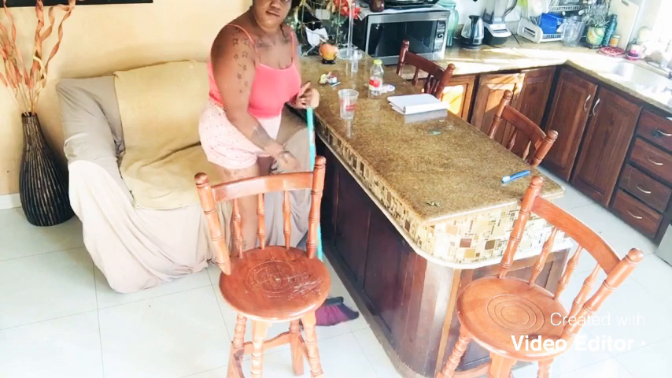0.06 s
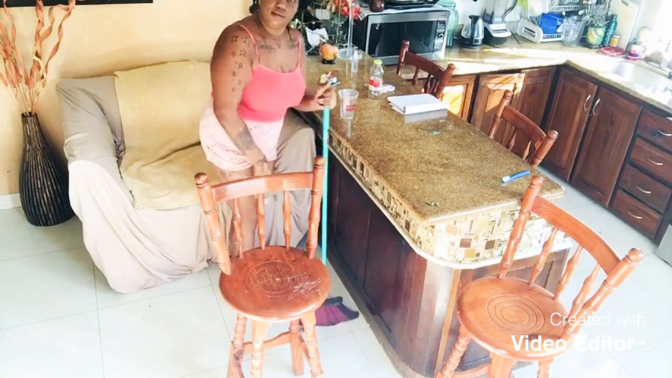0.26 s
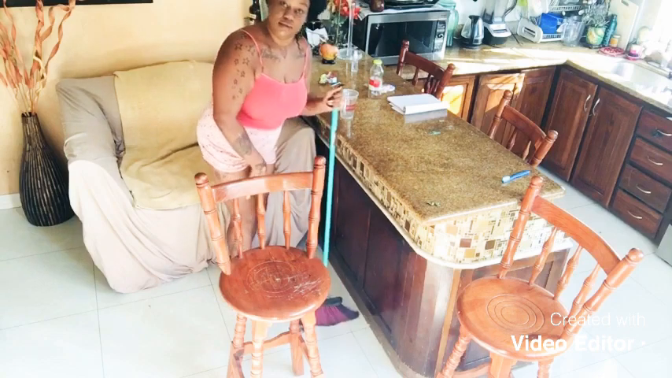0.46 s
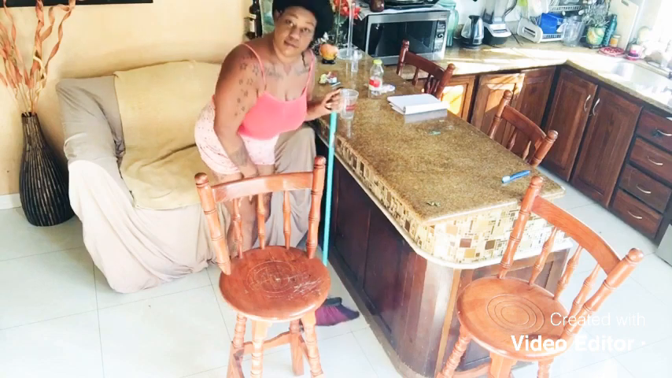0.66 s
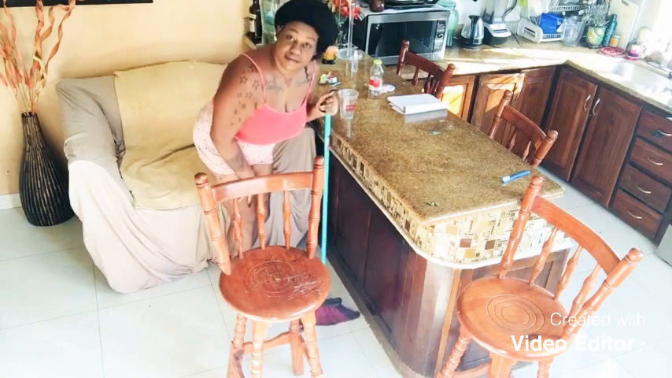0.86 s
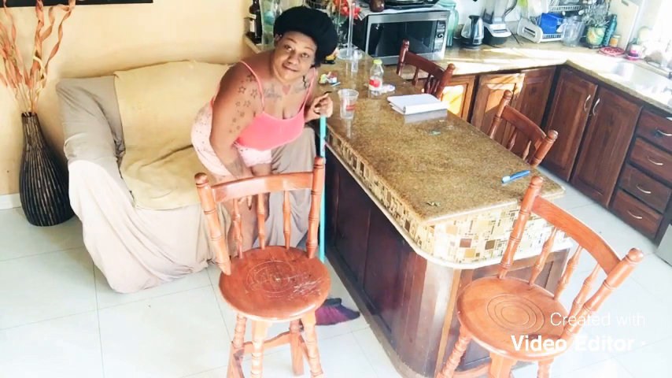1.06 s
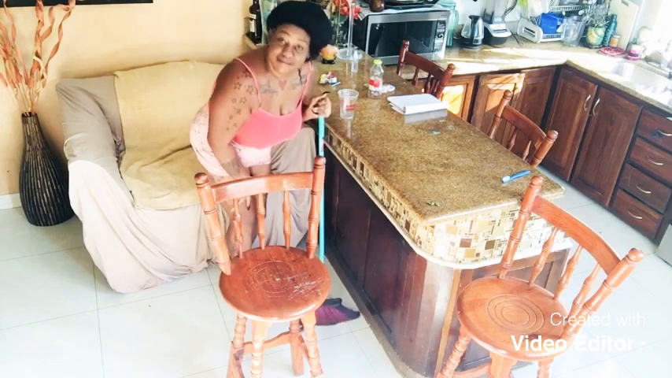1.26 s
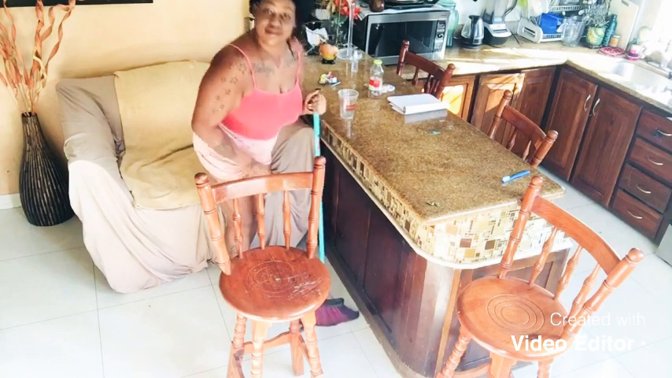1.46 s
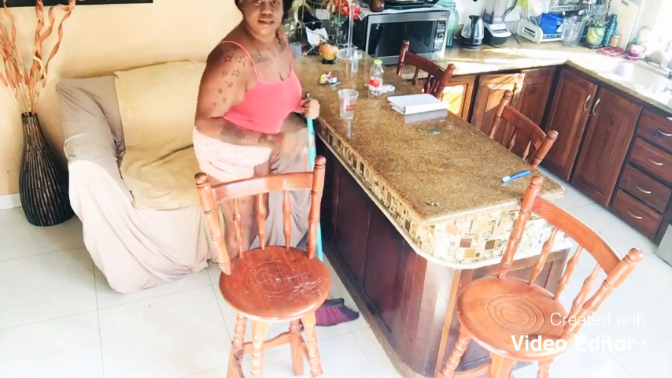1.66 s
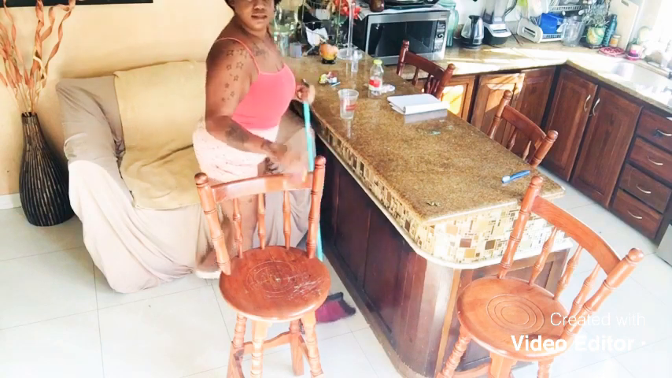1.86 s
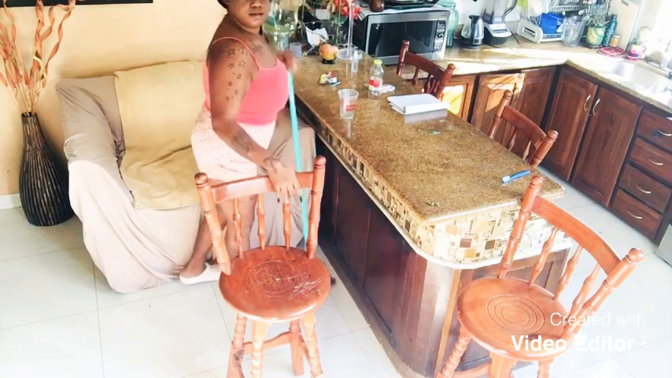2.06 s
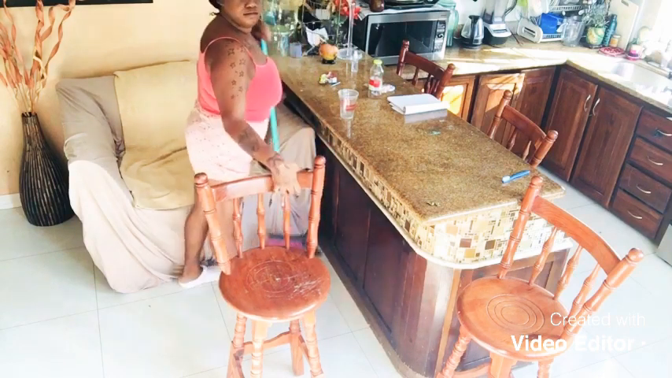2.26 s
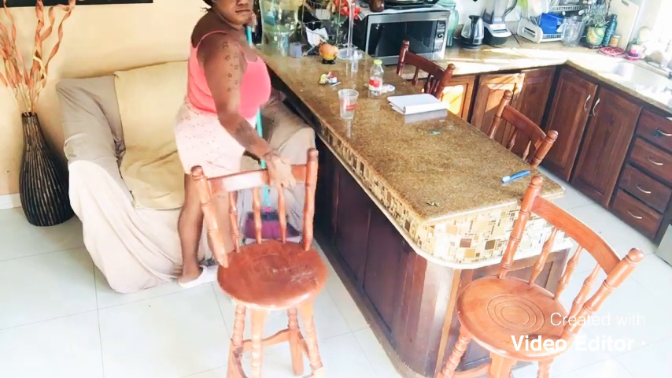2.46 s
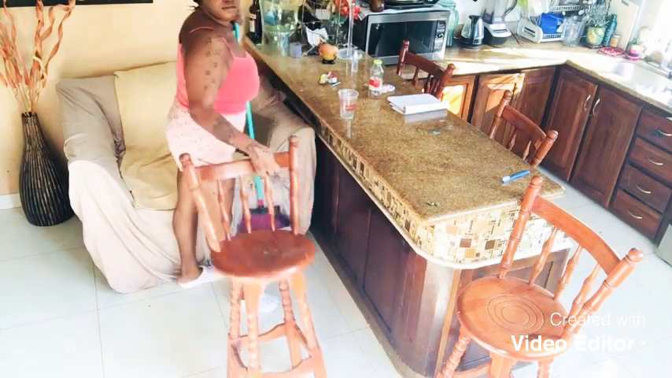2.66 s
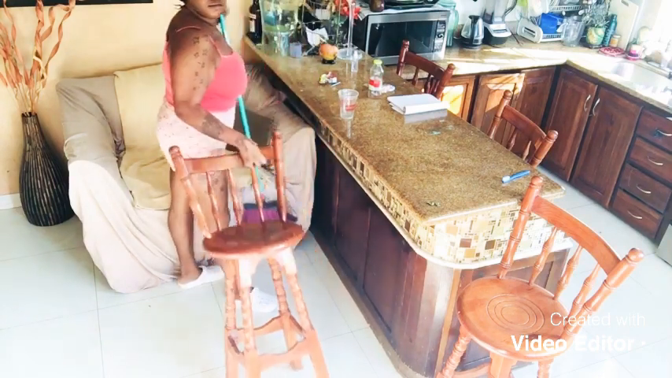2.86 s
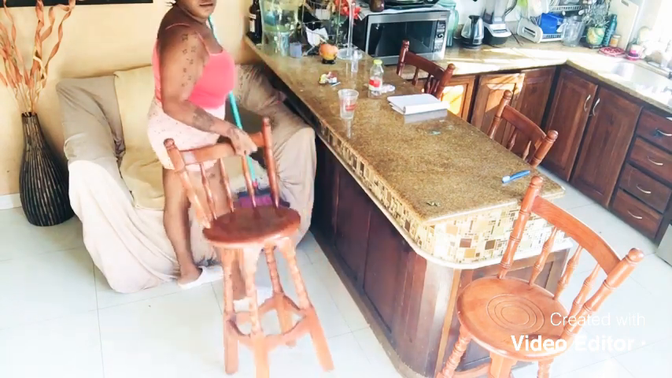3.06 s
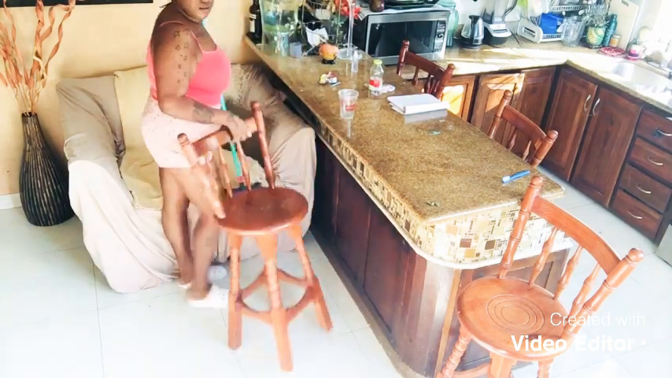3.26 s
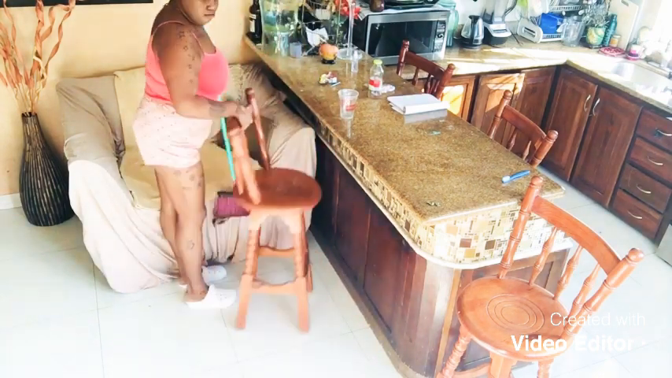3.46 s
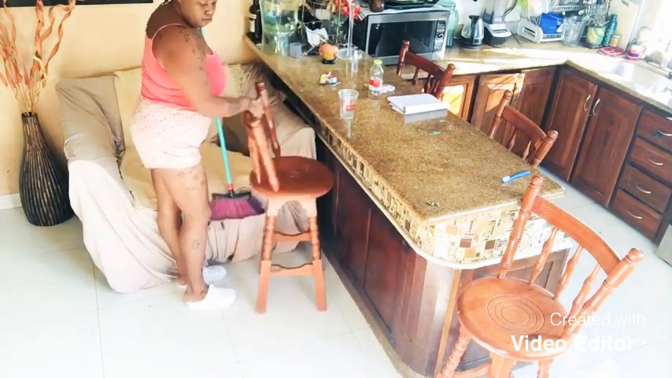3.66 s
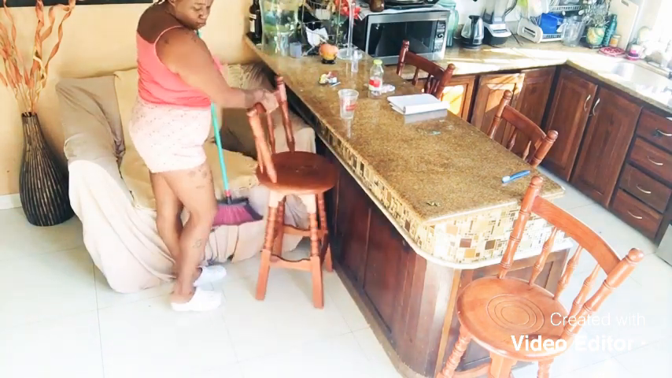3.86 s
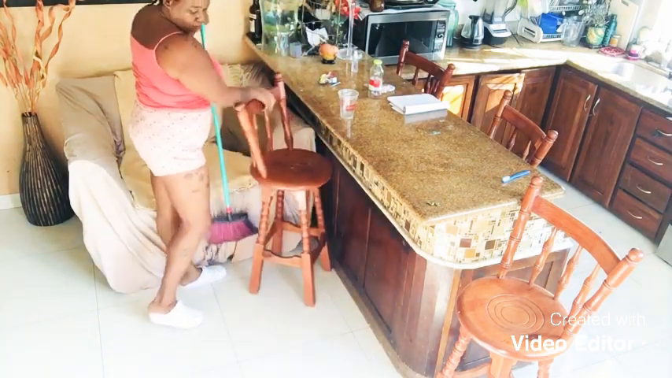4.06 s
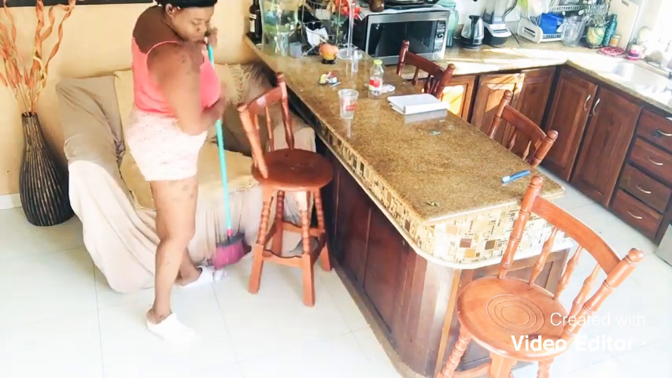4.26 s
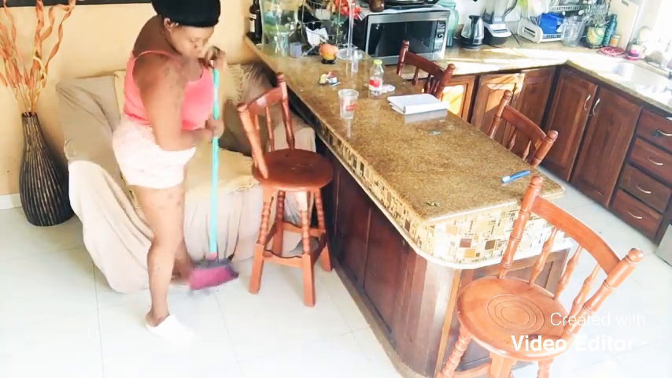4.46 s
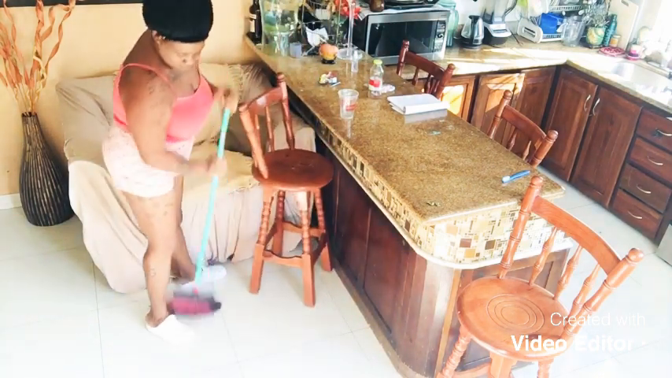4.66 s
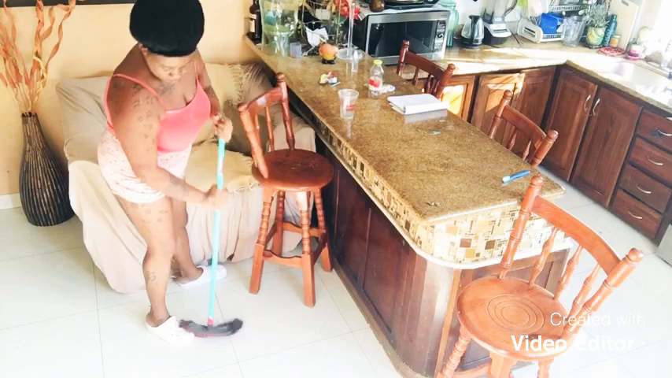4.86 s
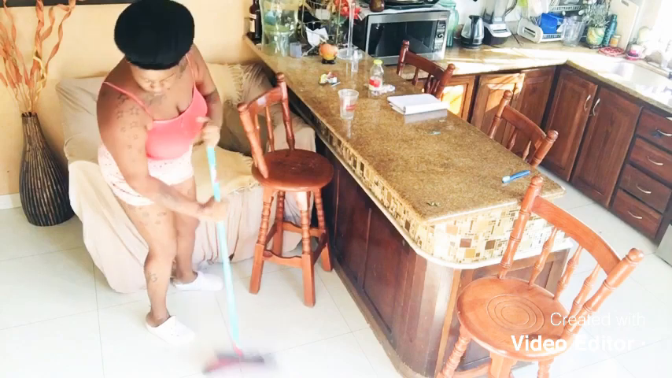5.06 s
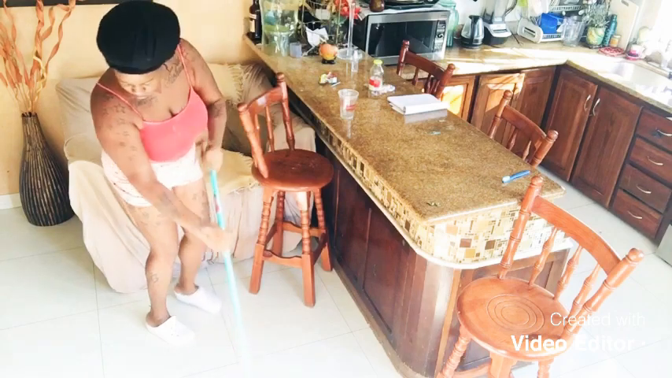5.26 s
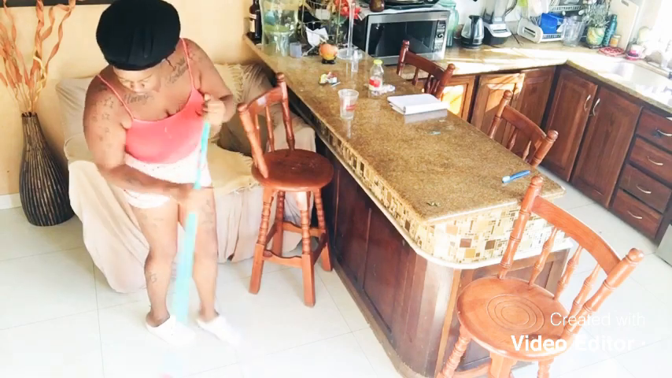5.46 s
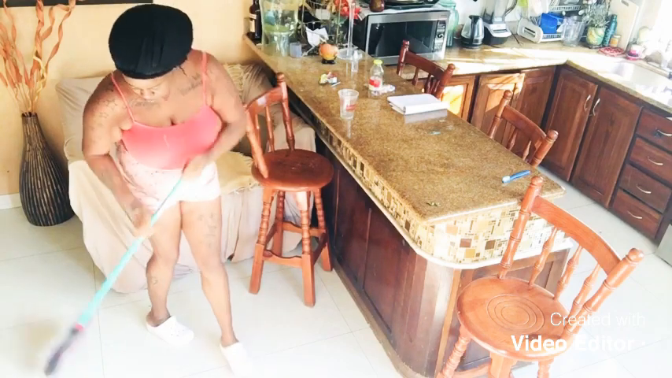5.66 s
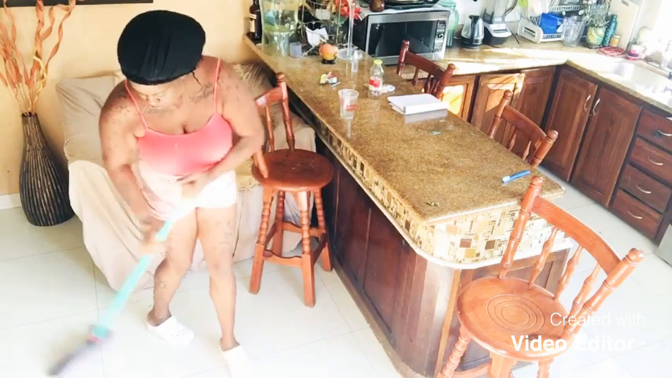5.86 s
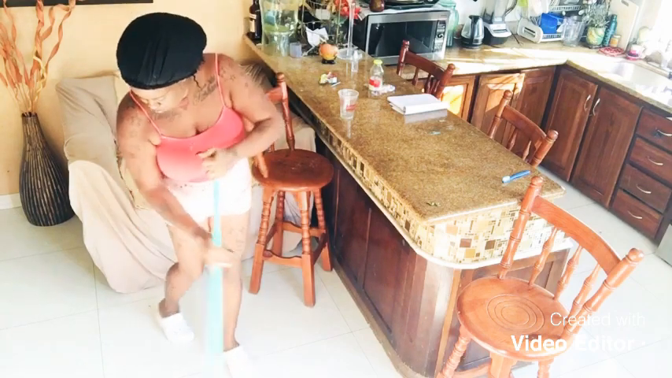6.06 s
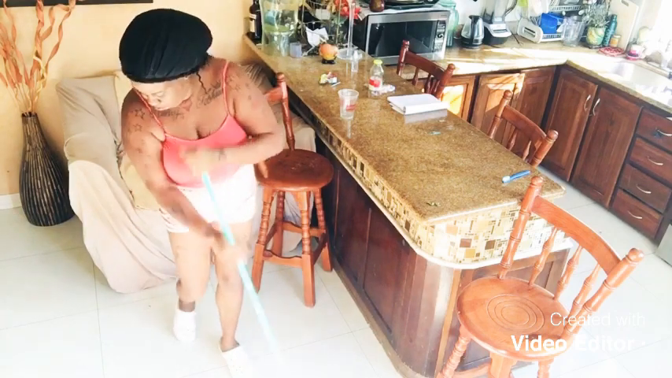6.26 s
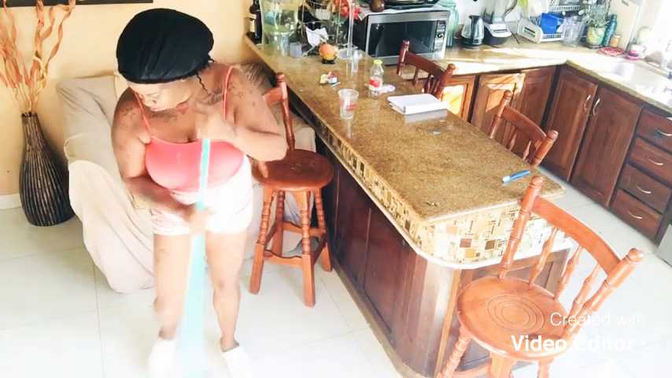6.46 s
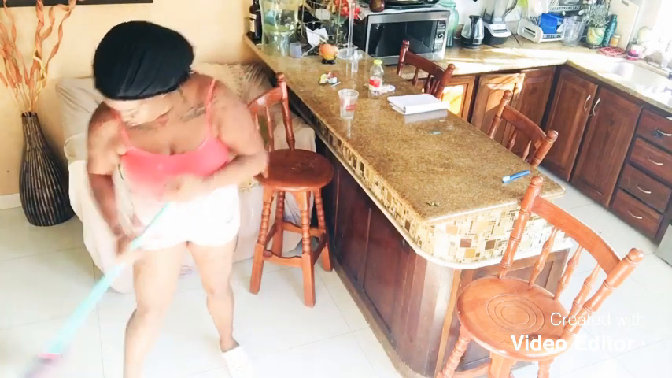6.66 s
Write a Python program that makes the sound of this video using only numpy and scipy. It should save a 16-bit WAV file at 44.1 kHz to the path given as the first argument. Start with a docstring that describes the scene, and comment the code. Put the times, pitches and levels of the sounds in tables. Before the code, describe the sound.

A wooden stool clatters onto kitchen tiles and scrapes along in several rough shoves, lasting about a second and a half near the middle. Before and after it come much quieter broom swishes and small clacks of the hollow handle, with one faint shoe squeak shortly before the stool moves. A refrigerator hums underneath, and the room rings briefly after each knock, all heard in mono through a phone microphone.

```python
"""A wooden bar stool is tipped, set down hard and dragged over kitchen tiles: its feet stick and slip,
ringing the wood and shaking the frame. Around it a broom's bristles sweep the floor, its hollow handle
clacks, and a rubber sole squeaks once. One phone microphone takes it all in mono, with the hard room
ringing after each knock and scrape and a refrigerator humming in the background."""
import sys
import numpy as np
from scipy import signal
from scipy.fft import rfft, irfft, next_fast_len
from scipy.io import wavfile
from scipy.ndimage import uniform_filter1d, map_coordinates

SR = 44100
rng = np.random.default_rng(int(sys.argv[2]) if len(sys.argv) > 2 else 0)


def to_wav(s):
    """Save 16-bit WAV."""
    ch = np.atleast_2d(s).T  # columns
    pcm = np.round(np.clip(ch, -1, 1) * 32767)  # PCM
    wavfile.write(sys.argv[1], SR, pcm.astype(np.int16))


N = 295911
T = np.arange(N) / SR
GRIP_S = 0.02  # time for a shove to take hold

# broad colour of the stool's wood: frequency_hz, relative_db
WOOD_COLOUR = [(40, -31.5), (75, -12), (150, -15), (300, -4.5), (600, -5.5), (1100, -2.5), (1800, -2),
               (2600, -6), (3500, -7.5), (4200, -14), (4900, -25.5), (6800, -28.5), (10000, -37),
               (15500, -50.5)]
# ringing of the seat and legs: pitch_hz, width_hz, boost_db
STOOL_MODES = [(477.3, 26, 4), (570, 20, 3.5), (649, 30, 5.5), (858.4, 23, 1.5), (967, 29, 5),
               (1112, 30, 7.5), (1180, 22, 1.5), (1300, 8.3, 0), (1510, 29, 1.5), (1624, 20, 7.5),
               (1735, 23, 4.5), (2027, 50, 4), (2166, 25, 4.5), (2307, 30, 1), (2586, 35, 1.5),
               (2860, 28, 0)]
# short slides of the stool, levels relative: start_s, length_s, scrape_db, grit_db, sway_db, judder_db
SHOVES = [(2.99, .11, -50.5, -70, -38.5, -49.5), (3.227, 0.057, -52.5, -58.5, -39, -51.5),
          (3.37, 0.031, -18, -49, -31, -29.5), (3.461, 0.249, -27, -52, -38, -29),
          (3.702, .125, -28, -49, -32, -30), (3.959, 0.09, -39, -57, -31.5, -35),
          (4.138, 0.046, -50, -56, -43, -41.5), (4.224, 0.059, -32, -53.5, -41, -29.5),
          (4.32, .05, -54, -59.5, -52, -45)]


def stool_blows(gain_db=16):
    """A leg strikes the tiles and rings the wood; the foot's rattle and near walls smear it to a clatter."""
    # leg strikes: start_s, relative_db, hardness_db, treble_db, thump_db, rattle_t60_s
    blows = [(2.978, -12.5, -4, 11, 3, 0.26), (3.235, -32, -7.5, 2.5, 1, 0.11),
             (3.368, 1.5, -6.5, 2, -12, 0.05), (3.378, -1, -2, 3, -8.5, 0.052),
             (3.961, -12, -5.5, 1, 3, 0.11), (3.975, -10, -26, -7, 0.5, 0.079),
             (4.207, -20.5, -3.5, 11, 6, 0.11), (4.228, -27, -15, 6, -2, 0.062)]
    out = np.zeros(N)
    for start, db, hard_db, treble_db, thump_db, rattle_t60 in blows:
        wood = body(WOOD_COLOUR, STOOL_MODES, hard_db, treble_db, thump_db)
        clatter = through(wood, room(wet_db=12.5, early_db=12.5, early_t60=rattle_t60))
        add(out, start, amp(db + gain_db) * unit_energy(clatter))
    return out


def stool_bites(gain_db=1):
    """Where a foot grips harder, its slips swell into a short, harsh rasp."""
    # a sliding foot bites into the tile: centre_s, relative_db, half_length_s, hardness_db
    bites = [(3.428, -25, 0.0027, 3), (3.521, -27.5, 0.008, -2), (3.549, -14.5, 0.0042, 1.5),
             (3.562, -16, 0.0028, -10), (3.579, -24, 0.0035, 4.5), (3.636, -26.5, 0.0093, -6.5),
             (3.692, -23.5, 0.0082, -3.5), (3.714, -17.5, 0.0054, 1), (3.734, -18.5, 0.008, 0.5),
             (3.766, -27.5, 0.0052, -1), (3.793, -19.5, 0.01, 6), (4.025, -37, 0.019, -4),
             (4.269, -25.5, 0.0047, -2.5)]
    out = np.zeros(N)
    t = T[:SR // 10] - .05  # seconds from the centre of a bite
    for centre, db, half_length, hard_db in bites:
        force = slips(rate_hz=900, scatter=.6, spread_db=3)[:len(t)] * np.exp(-(t / half_length) ** 2)
        wood = body(WOOD_COLOUR, STOOL_MODES, hard_db, bass_db=-7)
        rasp = through(force, wood, room(wet_db=-1, early_db=1.5))
        add(out, centre + t[0], amp(db + gain_db) * np.sqrt(2 * half_length * SR) * unit_energy(rasp))
    return out


def stool_drag(grit_gain_db=-.5):
    """The feet stick and slip on the tiles; fine grit hisses under them and rolls on after each shove."""
    starts, lengths, scrape_db, grit_db, _, _ = np.transpose(SHOVES)
    force = slips(rate_hz=300, scatter=.5, spread_db=4.5)
    wood = body(WOOD_COLOUR, STOOL_MODES, hard_db=-3, treble_db=-5.5, bass_db=-.5)
    scrape = unit_rms(through(force, wood)) * movements(starts, lengths, scrape_db, GRIP_S, t60=.2)
    # hiss of loose grit: frequency_hz, relative_db
    grit_colour = [(2500, -29.5), (4500, 0.5), (6800, -1.5), (8000, -12), (10000, -9.5), (12500, -16.5),
                   (15500, -23)]
    grit = coloured(rng.standard_normal(N) * amp(3.8 * wobble(470)), grit_colour)
    grit *= movements(starts, lengths, grit_db + grit_gain_db, GRIP_S, t60=.3)
    return through(scrape + grit, room(wet_db=-2.5, early_db=0))


def stool_frame(sway_gain_db=-3, judder_gain_db=-2):
    """The whole frame sways and judders with every shove, then settles."""
    # the frame's lowest bending mode: pitch_hz, width_hz, relative_db
    sway_modes = [(73.3, 22, -0.5)]
    # its higher bending modes: pitch_hz, width_hz, relative_db
    judder_modes = [(132, 24, -10), (173.9, 18, 0.5), (192.3, 18, -6), (237.4, 17, -6.5), (254, 15, -10),
                    (334.7, 24, -10), (357.4, 23, -3)]
    starts, lengths, _, _, sway_db, judder_db = np.transpose(SHOVES)
    sway = bending(sway_modes) * movements(starts, lengths, sway_db + sway_gain_db, GRIP_S, t60=.35)
    judder = bending(judder_modes) * movements(starts, lengths, judder_db + judder_gain_db, GRIP_S, t60=.46)
    return sway + judder


def bending(modes):
    """Slips shake low modes that pass no treble; friction holds the swing near rms 1."""
    def response(hz):
        return sum(amp(db) * (1j * hz * width / (pitch ** 2 - hz ** 2 + 1j * hz * width)) ** 2
                   for pitch, width, db in modes)
    ring = filtered(slips(rate_hz=90, scatter=.6, spread_db=2.5), response)
    power = np.abs(uniform_filter1d(ring ** 2, size=3000))
    return ring / np.sqrt(power + 1e-12)


def broom_sweeps(bristle_gain_db=-1, rub_gain_db=-6, lift_t60=.35):
    """Countless bristles flick over the tiles while the head rubs more darkly."""
    # broom strokes, levels relative: start_s, length_s, bristle_db, rub_db
    strokes = [(1.26, 0.28, -74.5, -69), (1.468, 0.13, -67, -69.5), (2.18, 0.053, -61, -55),
               (2.27, 0.22, -72, -59), (2.704, 0.15, -70, -62), (2.819, 0.26, -63.5, -55),
               (3.17, .16, -56, -50.5), (4.601, 0.052, -56, -60.5), (4.66, 0.086, -56.5, -54),
               (4.859, .11, -59, -56.5), (4.97, .19, -63.5, -76), (5.56, 0.081, -62.5, -64),
               (5.849, 0.27, -62, -67), (6.195, 0.3, -73, -75.5), (6.568, 0.097, -58, -52.5)]
    # hiss of the bristles: frequency_hz, relative_db
    bristle_colour = [(880, -36), (1500, -11.5), (1690, -8), (1900, -7.5), (2170, -2), (3440, 0.5),
                      (4990, -6), (6070, -5), (10400, -13), (11200, -11), (15500, -22)]
    # rubbing of the head: frequency_hz, relative_db
    rub_colour = [(300, -21), (800, -8), (1200, 1), (2000, -3.5), (3000, -10.5), (6000, -33.5)]
    starts, lengths, bristle_db, rub_db = np.transpose(strokes)
    press_s = .36 * lengths  # the bristles bend onto the floor
    hiss = coloured(rng.standard_normal(N) * amp(3 * wobble(900) + wobble(35)), bristle_colour)
    rub = coloured(rng.standard_normal(N) * amp(wobble(60)), rub_colour)
    hiss *= movements(starts, lengths, bristle_db + bristle_gain_db, press_s, lift_t60)
    rub *= movements(starts, lengths, rub_db + rub_gain_db, press_s, lift_t60)
    return through(hiss + rub, room(wet_db=-4, early_db=-7))


def broom_taps(gain_db=13, ring_width_hz=350, ring_db=13):
    """Light knocks of the hollow handle and bright flicks of the bristles; each favours its own pitch."""
    # handle knocks and bristle flicks: start_s, relative_db, treble_db, ring_hz
    taps = [(0.424, -46.5, -5, 1800), (0.771, -51, -8, 3200), (1.285, -48, -4, 3930),
            (1.5, -44.5, 24, 9200), (1.951, -31, -5.5, 1880), (2.16, -46.5, 2, 1900),
            (2.209, -47.5, 11, 10500), (2.28, -37, 1, 3800), (2.725, -47, -11, 3130),
            (5.346, -55.5, 22, 11100), (5.566, -51, 15, 3290), (5.6, -38, 7, 2300), (5.64, -41, -6.5, 1140),
            (6.627, -41, -8, 1100), (6.665, -44, 16, 2500)]
    # broad colour of the plastic: frequency_hz, relative_db
    plastic_colour = [(150, -20), (800, -9), (1400, -4.5), (2000, -3), (2700, -12), (4400, -7),
                      (5200, -8.5), (10000, -15.5), (15500, -23)]
    # ringing of the handle: pitch_hz, width_hz, boost_db
    handle_modes = [(1346, 46, 6.5), (1516, 30, -0.5), (1870, 140, 7.5), (4300, 80, 5.5)]
    out = np.zeros(N)
    for start, db, treble_db, ring_hz in taps:
        modes = handle_modes + [(ring_hz, ring_width_hz, ring_db)]
        contact = body(plastic_colour, modes, treble_db=treble_db)
        tap = through(contact, room(wet_db=9, early_db=9, early_t60=.03))
        add(out, start, amp(db + gain_db) * unit_energy(tap))
    return out


def sole_squeak(start_s=2.278, length_s=.075, level_db=-53.5, pitch_hz=1990, sag_hz_per_s=900):
    """A rubber sole twists on the tile with a rough note that sinks as the foot slows."""
    hz = pitch_hz - sag_hz_per_s * np.clip(T - start_s, 0, length_s)
    hz *= 1 + .037 * wobble(700)  # pitch jitter
    note = np.sin(2 * np.pi * np.cumsum(hz) / SR)
    level = amp(level_db + 3 * wobble(150)) * swell(start_s, length_s, attack=.006, t60=.21)
    return through(level * note, room(wet_db=-3, early_db=-5))


def refrigerator(drone_hz=96.8):
    """The motor drones unsteadily under thin, wavering tones."""
    # level of the drone: time_s, level_db
    drone_levels = [(0, -60.5), (1.1, -60), (1.75, -67.5), (2.15, -59.5), (2.95, -51.5), (4.5, -68),
                    (5.1, -57.5), (6.1, -65), (6.7, -61.5)]
    # tones of the motor and electronics: pitch_hz, width_hz, level_db
    tones = [(213.2, 8.8, -70.5), (372.7, 5, -82.5), (2560, 14, -87), (3600, 20, -86.5), (4106, 25, -90.5),
             (4430, 15, -87), (4500, 10, -92.5), (8030, 42, -86.5)]
    drone = np.sqrt(2) * np.sin(2 * np.pi * drone_hz * T + .5 * wobble(7))
    drone *= amp(np.interp(T, *np.transpose(drone_levels)))
    return drone + sum(amp(db) * noise_band(hz, width) for hz, width, db in tones)


def room_tone(air_db=-65, rumble_db=-60):
    """The kitchen's own quiet: steady air over a low, drifting rumble."""
    # background noise of the room: frequency_hz, relative_db
    air_colour = [(25, -19.5), (60, -11), (125, -5), (220, 1), (300, -8), (430, -10.5), (600, -12.5),
                  (1200, -18.5), (2600, -23), (4600, -25), (5100, -28), (8100, -30.5), (12000, -34.5),
                  (15500, -42.5)]
    air = amp(air_db) * coloured(rng.standard_normal(N), air_colour)
    rumble = amp(rumble_db + wobble(3)) * noise_band(centre_hz=76, width_hz=22)
    return air + rumble


def room(wet_db, early_db, early_t60=.052):
    """Path to the microphone: direct sound, early reflections off floor and cabinets, then the tail."""
    # reverberation of the kitchen: frequency_hz, t60_s
    decay_times = [(100, 0.65), (260, 0.79), (700, 0.6), (1840, 0.47), (4850, 0.58), (14000, .3)]
    hz, t, spectra = signal.stft(rng.standard_normal(SR * 3 // 4), SR, nperseg=256)
    decay = amp(-60 * t / along(decay_times, hz)[:, None])
    _, tail = signal.istft(spectra * decay, SR, nperseg=256)
    early = rng.standard_normal(len(tail)) * amp(-60 * T[:len(tail)] / early_t60)
    response = amp(wet_db) * unit_energy(tail) + amp(early_db) * unit_energy(early)
    response[0] += 1  # direct sound
    return unit_energy(response)


def body(colour, modes, hard_db=0, treble_db=0, bass_db=0, hard_hz=2400, bass_hz=400, size=8192):
    """Impulse response of an object: a broad colour with ringing modes; hard contact lifts its top."""
    hz = np.fft.rfftfreq(size, 1 / SR)
    peaks = 1 + sum((amp(db) ** 2 - 1) / (1 + (2 * (hz - pitch) / width) ** 2) for pitch, width, db in modes)
    shelves_db = hard_db * above(hz, hard_hz) + treble_db * above(hz) + bass_db * (1 - above(hz, bass_hz))
    magnitude = amp(along(colour, hz) + shelves_db) * np.sqrt(np.abs(peaks))
    cepstrum = irfft(np.log(magnitude))
    minimum_phase = np.exp(rfft(2 * cepstrum[:size // 2], size))  # nothing rings before the strike
    return unit_energy(irfft(minimum_phase))


def slips(rate_hz, scatter, spread_db):
    """Stick-slip impulses at uneven intervals and of uneven size."""
    gaps, sizes = rng.standard_normal((12000, 2)).T
    at = (np.cumsum(np.exp(scatter * gaps)) * SR / rate_hz).astype(int)
    return np.bincount(at[at < N], amp(spread_db * sizes[at < N]), N)


def swell(start, length, attack, t60):
    """Envelope of one movement: it rises, holds, then dies away."""
    rise = np.sin(np.pi / 2 * np.clip((T - start) / attack, 0, 1))
    return rise * amp(-60 * np.clip((T - start - length) / t60, 0, 2))


def movements(starts, lengths, levels_db, attacks, t60):
    """Envelope of a series of movements, summed in power."""
    rows = np.broadcast(starts, lengths, levels_db, attacks)
    return np.sqrt(sum((amp(db) * swell(s, length, attack, t60)) ** 2 for s, length, db, attack in rows))


def noise_band(centre_hz, width_hz):
    """A narrow band of noise at rms 1."""
    return unit_rms(filtered(rng.standard_normal(N), lambda hz: 1 / (1 + ((hz - centre_hz) / width_hz) ** 2)))


def coloured(x, colour):
    """Shape x by (Hz, dB) points, at rms 1."""
    return unit_rms(filtered(x, lambda hz: amp(along(colour, hz))))


def wobble(rate):
    """A smooth random curve, rate knots a second."""
    return map_coordinates(rng.standard_normal(int(N * rate / SR) + 4), [T * rate])


def filtered(x, response):
    """Filter x by a gain that depends on frequency."""
    size = next_fast_len(N + SR // 2)
    return irfft(rfft(x, size) * response(np.fft.rfftfreq(size, 1 / SR)), size)[:N]


def through(x, *responses):
    """Pass x through impulse responses in turn."""
    for response in responses:
        x = signal.fftconvolve(x, response)[:N]
    return x


def above(hz, edge_hz=4700):
    """A smooth step from 0 below the edge to 1 above."""
    return 1 - 1 / (1 + (hz / edge_hz) ** 10)


def along(points, hz):
    """Read (Hz, value) points on a log frequency axis."""
    knots_hz, values = np.transpose(points)
    return np.interp(np.log(hz + 1), np.log(knots_hz + 1), values)


def add(track, start_s, sound):
    """Mix a sound into the track."""
    part = track[round(start_s * SR):][:len(sound)]
    part += sound[:len(part)]


def amp(db):
    """Decibels to gain."""
    return 10 ** (np.asarray(db) / 20)


def unit_rms(x):
    """Scale to rms 1."""
    return x / np.sqrt(np.mean(x ** 2) + 1e-20)


def unit_energy(x):
    """Scale to energy 1."""
    return x / np.linalg.norm(x)


def scene():
    """Stool, broom, sole and kitchen background at one microphone."""
    stool = stool_blows() + stool_bites() + stool_drag() + stool_frame()
    broom = broom_sweeps() + broom_taps()
    return (stool + broom + sole_squeak() + refrigerator() + room_tone())[None]


def record(dry, ceiling=.88, low_cut_hz=36, top_hz=15720):
    """The phone rounds off the highest peaks, drops the deepest bass and keeps nothing above top_hz."""
    rounded = dry[0] / (1 + np.abs(dry[0] / ceiling) ** 6) ** (1 / 6)
    return filtered(rounded, lambda hz: above(hz, low_cut_hz) ** .5 * (hz < top_hz))[None]


dry = scene()
out = record(dry)
to_wav(out)
```